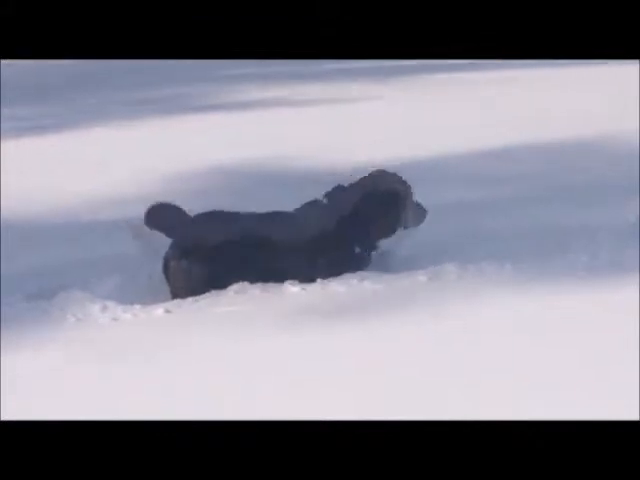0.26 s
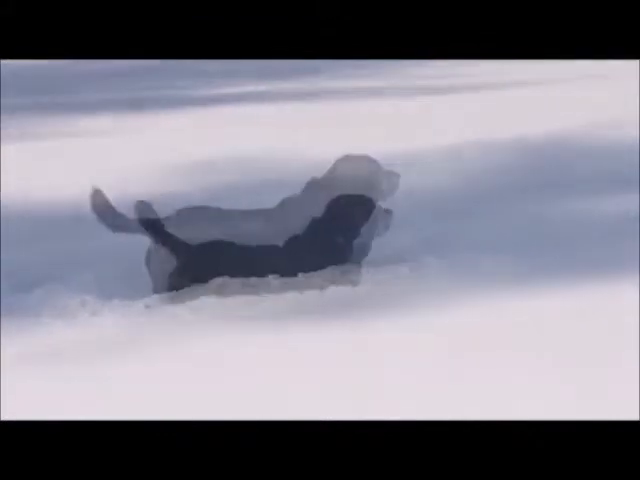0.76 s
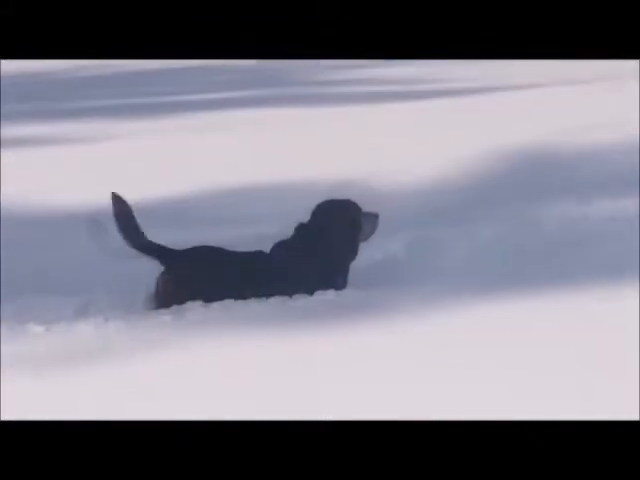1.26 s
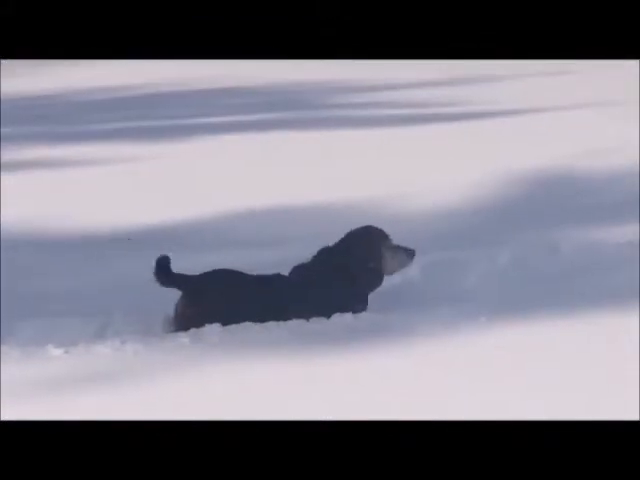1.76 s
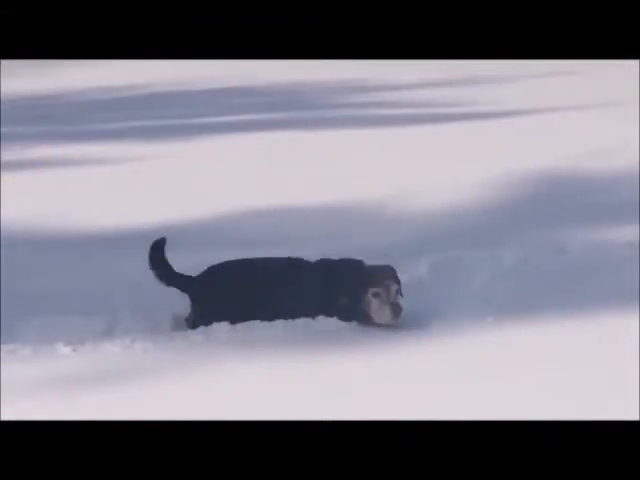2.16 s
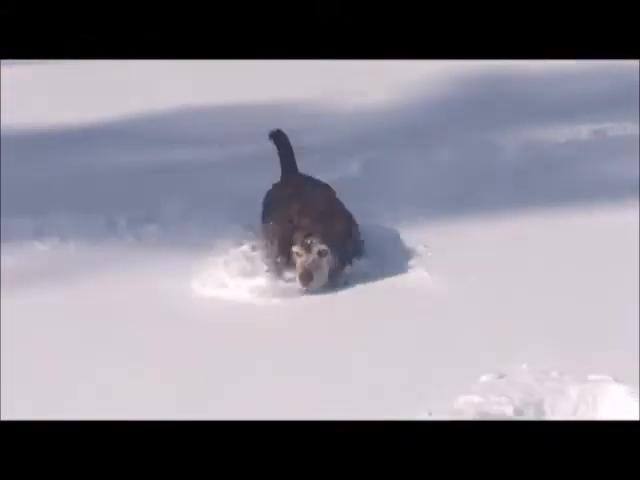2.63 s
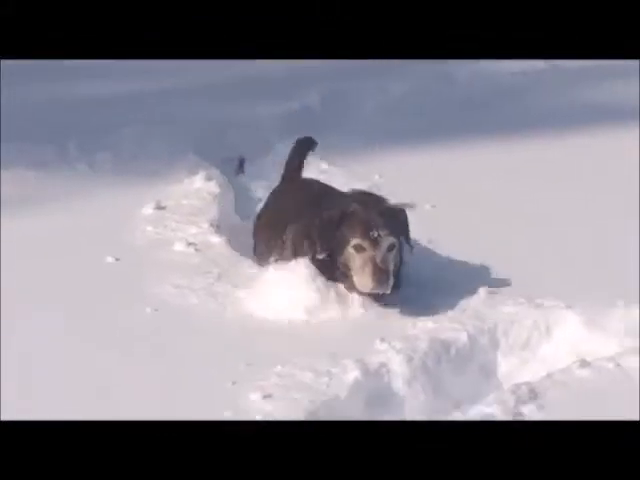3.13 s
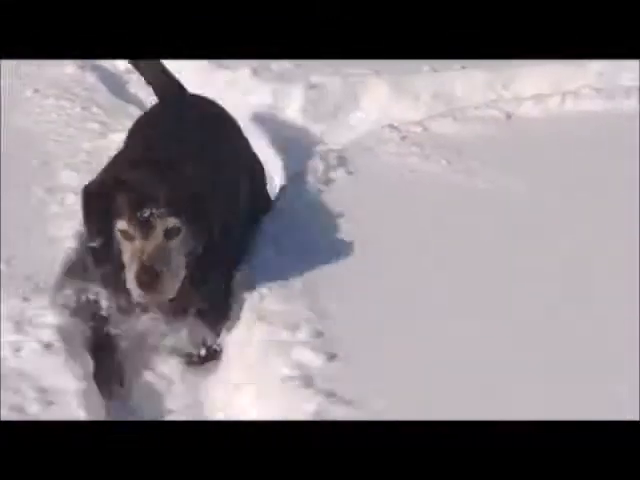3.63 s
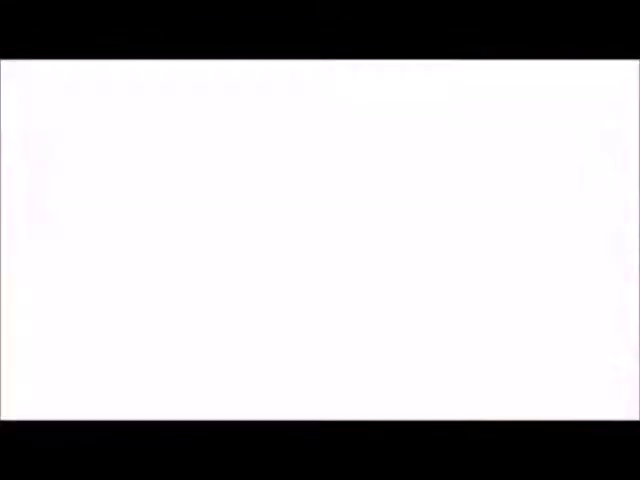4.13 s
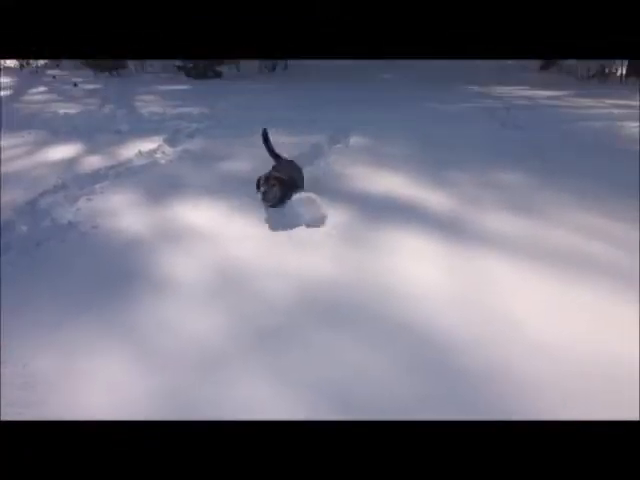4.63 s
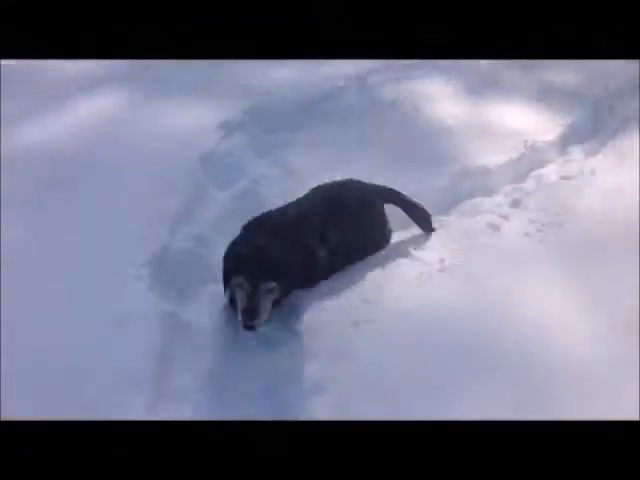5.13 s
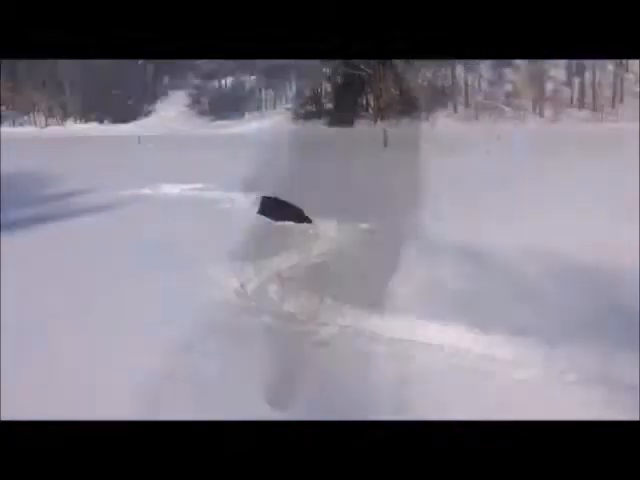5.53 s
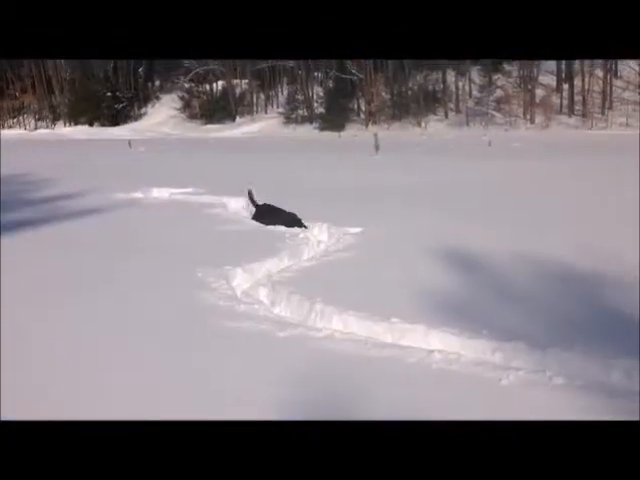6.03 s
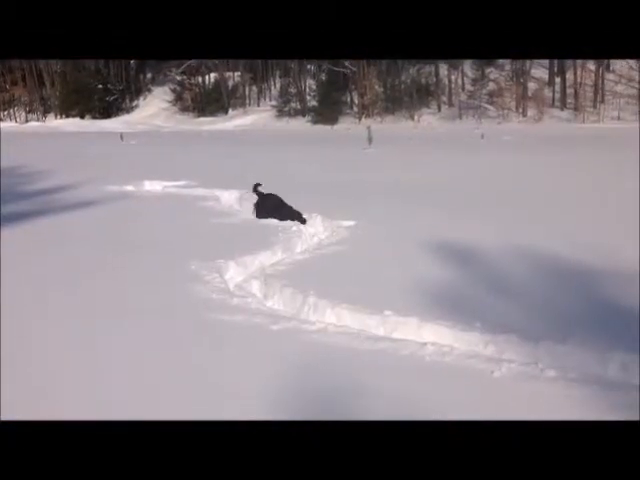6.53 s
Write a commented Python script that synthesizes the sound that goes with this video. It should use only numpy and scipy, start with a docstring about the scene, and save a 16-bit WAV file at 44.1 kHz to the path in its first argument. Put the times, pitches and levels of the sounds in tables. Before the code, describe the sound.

A dog wades through deep snow in a quiet open field, rustling and crunching faintly. Right at the microphone, fingers rub, tick and squeak on a small camera. Past the middle a loud sharp knock briefly cuts the sound out. The dog trots a few soft steps and two more knocks follow. The wading stops, leaving thin hiss and a barely audible distant engine.

```python
"""An open field in deep snow, heard through the microphone of a small hand-held camera.
From the start, over still winter air and hiss, a wading dog makes the snow rustle and crunch faintly,
while fingers rub, squeak and tick on the case, right at the microphone. After four seconds a hard knock
jolts the camera and the sound drops out briefly. The dog trots a few steps, and two more knocks follow.
As the wading stops, a far-off engine comes in for the last second."""
import sys
import numpy as np
from scipy import signal
from scipy.fft import rfft, irfft
from scipy.io import wavfile
from scipy.ndimage import uniform_filter1d

SR = 44100
rng = np.random.default_rng(int(sys.argv[2]) if len(sys.argv) > 2 else 0)


def int16_out(signal):
    """Quantize to a 16-bit WAV file."""
    q = np.round(np.clip(np.atleast_2d(signal).T, -1, 1) * 32767)
    wavfile.write(sys.argv[1], SR, q.astype(np.int16))


N = 299424
TIME = np.arange(N) / SR


# Hard knocks on the camera, right at the microphone. Each row: start in seconds, snap peak in dB,
# snap cutoff in Hz, thump gain in dB, thump pitch in Hz, thump decay in cycles, thump low cut in Hz,
# rattle gain in dB, release time in seconds, release click peak in dB.
KNOCKS = [(4.1039, -0.5, 3043, 1.5, 296, .5, 232.2, -38.5, 4.1454, -21),
          (5.0603, -5.5, 3400, -4, 255, 0.51, 55, -38.5, 5.1118, -23),
          (5.6363, -3, 3030, -4, 288, 0.51, 79.5, -40, 5.6845, -27)]
# The rattle after a knock. Each row: frequency in Hz, relative level in dB.
RATTLE_SPECTRUM = [(60, -5), (250, 5.5), (500, -8.5), (900, -12), (2000, -19), (2900, -17), (5000, -23),
                   (8000, -34.5), (15000, -45.5)]

def knocks(bounce_s=.00075, bounce_db=-19, rattle_s=0.0071, linger_db=-9):
    """A hard snap with a tiny bounce, a damped thump, then a rattle that ends in a release click."""
    out = np.zeros(N)
    t = clock(.03)
    tap = signal.unit_impulse(len(t))

    def swing(hz, cycles):
        """The camera body swings and dies within a cycle or two."""
        return np.sin(2 * np.pi * hz * t) * np.exp(-t * hz / cycles)

    for s, snap_db, snap_hz, thump_db, hz, cycles, cut_hz, rattle_db, release_s, click_db in KNOCKS:
        snap = peak(butter(tap, snap_hz, "low", order=3), snap_db)
        thump = undb(thump_db) * butter(swing(hz, cycles), cut_hz, "high", order=1)
        add(out, s, snap + thump)
        add(out, s + bounce_s, undb(bounce_db) * snap)
        held = clock(release_s - s)
        rattle = colour(grains(len(held), rate=3000, spread_db=1.2), RATTLE_SPECTRUM)
        settling = undb(linger_db) + 3.7 * np.exp(-held / rattle_s)
        add(out, s, level(rattle, rattle_db) * settling)
        click = peak(butter(tap, 3200, "low"), 0) + 0.42 * swing(hz=1100, cycles=0.32)
        add(out, release_s, peak(click, click_db))
    return out


# Finger strokes on the case, close to the microphone. Each row: start in seconds, rise in seconds,
# length in seconds, level at the crest in dB, damping of the case as a factor.
FINGER_STROKES = [(0.103, .008, 0.3, -57, 2), (.257, 0.019, 0.043, -39, 3.4),
                  (.29, 0.055, .088, -44.5, 3.1), (.645, 0.018, .17, -50.5, 1.3),
                  (1.382, 0.037, 0.058, -62.5, 0.91), (2.55, .014, .14, -50.5, 1.4),
                  (2.688, .016, 0.062, -47, 1.3), (2.731, 0.031, 0.18, -57, 1.7),
                  (3.453, .002, 0.027, -31, 16), (3.465, 0.016, 0.041, -33.5, 5.5),
                  (3.504, 0.016, 0.059, -39.5, 4.6), (3.568, 0.015, 0.034, -45, 4.5),
                  (3.594, 0.0056, 0.062, -33.5, 4.3)]

def rubs(rise_db=10, fall_db=15.5, edge_s=0.0021, fizz_db=-33):
    """Stick-slip of skin drives the case in swelling strokes; firm ones are brighter and fizz."""
    out = np.zeros(N)
    for s, rise_s, length, db, damping in FINGER_STROKES:
        t = clock(length)
        swell_db = np.interp(t, [0, rise_s, length], [-rise_db, 0, -fall_db])
        edges = np.minimum(np.minimum(t, t[-1] - t) / edge_s, 1)
        stroke = edges * undb(swell_db)
        slips = grains(len(t), rate=4500, spread_db=3) * stroke
        sound = level(case(slips, damping, soft_hz=5500 + 150 * damping, crisp_db=-47), 0)
        sound[:len(t)] += damping * level(butter(slips, 6100, "high"), fizz_db)
        stroke_rms = np.sqrt(np.sum(stroke ** 2) / len(sound))
        add(out, s, sound * undb(db) * stroke_rms)
    return out


# The clearest finger taps on the case. Each row: start in seconds, peak in dB, contact cutoff in Hz.
FINGER_TICKS = [(0.3855, -21, 4200), (0.619, -35.5, 9100), (1.4942, -44, 12000), (2.1475, -39, 6000),
                (3.4467, -21, 5970), (3.4538, -24, 12000), (3.4562, -23.5, 16000), (3.769, -32, 6000),
                (3.912, -43.5, 6000), (4.0084, -31, 5150)]

def ticks(fidget_s=(3.65, 4.0), faint_db=-46.5, faint_hz=7500, scatter_db=2, count=6):
    """Taps on the case, a nail brighter than a fingertip, plus faint random ones as the grip shifts."""
    out = np.zeros(N)
    faint = [(rng.uniform(*fidget_s), faint_db + scatter_db * rng.standard_normal(), faint_hz)
             for _ in range(count)]
    for s, db, contact_hz in FINGER_TICKS + faint:
        tick = case(np.ones(1), damping=1.9, soft_hz=contact_hz, skirt=1.0)
        add(out, s, peak(tick, db))
    return out


# Skin squeaking on the case. Each row: start in seconds, length in seconds, peak in dB.
SKIN_SQUEAKS = [(0.514, 0.02, -53.5), (0.743, 0.011, -48.5), (0.829, 0.015, -45), (.842, 0.0074, -48),
                (0.915, 0.026, -43), (0.937, 0.0115, -48.5), (1.05, 0.013, -39.5)]

def squeaks(start_hz=3500, end_hz=1450, bend=1.2, octave_db=-22):
    """Regular slips slow down as the finger stops, loudest as they sweep through the case modes."""
    out = np.zeros(N)
    for s, length, db in SKIN_SQUEAKS:
        progress = clock(length) / length
        slip_hz = start_hz + (end_hz - start_hz) * progress ** bend
        phase = 2 * np.pi * np.cumsum(slip_hz) / SR
        grip = np.abs(np.sin(np.pi * progress ** 1.12))  # builds more slowly than it lets go
        slips = (np.sin(phase) + undb(octave_db) * np.sin(2 * phase)) * grip
        add(out, s, peak(case(slips, damping=5), db))
    return out


# Modes of the case around the microphone. Each row: frequency in Hz, base width in Hz, gain in dB.
CASE_MODES = [(2976, 200, 9.5), (3390, 295, 2.5), (3770, 210, -5.5), (4425, 210, -2.5), (7250, 1600, -28)]

def case(force, damping, soft_hz=9000, skirt=0.29, crisp_db=-50):
    """The case rings; a pressing finger widens the modes and passes more force straight through."""
    force = np.pad(force, (0, 400))  # room to ring out
    damping = max(damping, 1)
    ring = 0
    for hz, width, db in CASE_MODES:
        once = resonate(force, hz, width * damping)
        twice = resonate(once, hz, width * damping)
        ring = ring + undb(db) * (twice + skirt * damping * once)
    return butter(ring, soft_hz, "low") + undb(crisp_db) * damping * force


# The dog's loudest steps, out in the field. Each row: start in seconds, peak in dB, pitch in Hz.
STEP_CRUNCHES = [(.631, -47, 259), (0.913, -48, 500), (1.432, -48.5, 280), (1.964, -51.5, 790),
                 (2.206, -45, 780), (2.859, -45.5, 398), (3.174, -44, 477), (3.186, -40.5, 318),
                 (3.454, -27, 330), (4.271, -43.5, 750), (4.417, -42, 620), (4.672, -43.5, 550),
                 (4.880, -43, 564), (4.921, -39, 720), (5.0233, -39.5, 850), (5.032, -35, 580),
                 (5.406, -41.5, 550), (5.537, -39.5, 640)]

def crunches(collapse_s=.005, small_over_rustle_db=11.5, small_hz=550, scatter_octaves=.4, count=26):
    """Packed snow collapses in dull cracks, muffled by powder; lesser collapses come at random."""
    out = np.zeros(N)
    times = (np.arange(count) + rng.random(count)) * WADING_END_S / count
    small = [(s, wading_db(s) + small_over_rustle_db + 2 * size, small_hz * 2 ** (scatter_octaves * z))
             for s, (size, z) in zip(times, rng.standard_normal((count, 2)))]
    for s, db, hz in STEP_CRUNCHES + small:
        cracks = undb(-10) * grains(len(clock(collapse_s)), rate=450, spread_db=4.5)
        cracks[0] = 1  # the opening crack
        body = resonate(np.pad(cracks, (0, 400)), hz, width_hz=0.92 * hz)
        muffled = butter(body, 2.2 * hz, "low")
        add(out, s, peak(muffled, db))
    return out


# The dog's deep plunges into powder. Each row: start in seconds, length in seconds, crest level in dB.
PLUNGES = [(4.232, 0.029, -54.5), (4.841, 0.027, -50.5), (5.584, 0.034, -53)]

def swishes(trot_start_s=4.364, paw_period_s=.116, paw_s=0.027, paw_db=-61, paws=4):
    """Loose powder slides in short soft swells, swept aside by a plunge or brushed by a trotting paw."""
    out = np.zeros(N)
    trot = [(trot_start_s + k * paw_period_s, paw_s, paw_db) for k in range(paws)]
    for s, length, db in PLUNGES + trot:
        n = len(clock(length))
        sliding = resonate(rng.standard_normal(n), hz=3480, width_hz=1100)
        powder = butter(sliding, 6500, "low", order=4)
        add(out, s, level(powder, db) * signal.windows.cosine(n))
    return out


# The snow's rustle as it reaches the microphone. Each row: frequency in Hz, relative level in dB.
RUSTLE_SPECTRUM = [(24, -55.5), (40, -28), (80, -21), (108, 0.5), (240, 0.5), (292, -2), (325, -3.5),
                   (370, -4.5), (547, -9.5), (1540, -18.5), (3510, -13.5), (5170, -21.5), (7000, -19),
                   (9100, -55.5), (15400, -120)]

def rustle(split_hz=1400, grain_flicker_db=2.7, powder_flicker_db=2.0):
    """Dull snow grains shift unevenly under a smooth hiss of powder as the dog wades."""
    shifts = level(grains(N, rate=1200, spread_db=3), 0)
    packed = butter(shifts, split_hz, "low") * undb(grain_flicker_db * wander(25))
    powder = butter(rng.standard_normal(N), split_hz, "high") * undb(powder_flicker_db * wander(29))
    snow = butter(colour(packed + powder, RUSTLE_SPECTRUM), 5500, "low")
    return level(snow, 0) * undb(wading_db(TIME)) * (TIME < WADING_END_S)


# The wading, faint at the microphone, in two stretches. Each row: time in seconds, level in dB.
WADING_LEVELS = [
    [(0.0, -62), (0.35, -58), (1.74, -66.5), (2.61, -63), (3.17, -64), (3.56, -58.5), (4.08, -61.5)],
    [(4.26, -63), (4.778, -62), (4.912, -56.5), (5.024, -56), (5.296, -58.5), (5.536, -54.5), (5.6, -55)],
]
WADING_END_S = 5.685

def wading_db(s):
    """Level of the wading at time s."""
    return np.interp(s, *np.vstack(WADING_LEVELS).T)


def engine(start_s=5.7, throttle_s=5.95, firing_hz=318, climb_hz_per_s=22, fade_s=0.23, db=-73):
    """A far engine holds its speed, then gathers more; mostly its second harmonic crosses the snow."""
    hz = firing_hz + climb_hz_per_s * np.maximum(TIME - throttle_s, 0)
    phase = 2 * np.pi * np.cumsum(hz * (1 + 0.0053 * wander(30))) / SR
    flutter = undb(3 * wander(16))
    tone = (np.sin(2 * phase) + undb(-9) * np.sin(phase)) * flutter
    fade = np.clip(np.minimum(TIME - start_s, TIME[-1] - TIME) / fade_s, 0, 1)
    return level(tone, db) * fade


# Winter air over the open field. Each row: frequency in Hz, relative level in dB.
AIR_SPECTRUM = [(25, -4.5), (60, -0.5), (100, 5.5), (180, 3), (330, -3.5), (700, -5), (1100, -11.5),
                (3000, -12.5), (7000, -19.5), (16000, -25)]

def air(db=-66.0, drift_db=0.46):
    """Still outdoor air makes a low hush whose level drifts slightly."""
    hush = colour(rng.standard_normal(N), AIR_SPECTRUM)
    return level(hush, db) * undb(drift_db * wander(1.9))


# The microphone's own noise. Each row: frequency in Hz, relative level in dB.
HISS_SPECTRUM = [(3000, -24), (7000, -9), (9200, -0.5), (12000, -9.5), (16000, -10.5)]
# The rise and fall of that noise. Each row: time in seconds, level in dB.
HISS_LEVELS = [(0, -70), (1.0, -67), (1.6, -71.5), (4.9, -70.5), (6.79, -73)]

def microphone_hiss():
    """The microphone adds a thin, high hiss under everything."""
    hiss = colour(rng.standard_normal(N), HISS_SPECTRUM)
    return level(hiss, np.interp(TIME, *np.transpose(HISS_LEVELS)))


def undb(db):
    """Decibels to gain."""
    return 10 ** (np.asarray(db) / 20)


def level(x, db):
    """Scale to an rms level."""
    return x * undb(db) / np.sqrt(np.mean(x ** 2))


def peak(x, db):
    """Scale to a peak level."""
    return x * undb(db) / np.max(np.abs(x))


def clock(length):
    """Sample times of a short sound."""
    return np.arange(max(int(length * SR), 16)) / SR


def add(out, s, x):
    """Mix x into out from time s."""
    start = max(int(round(s * SR)), 0)
    out[start:start + len(x)] += x[:max(N - start, 0)]


def butter(x, hz, kind, order=2):
    """Low-pass or high-pass."""
    return signal.sosfilt(signal.butter(order, min(hz, SR / 2 - 100), kind, fs=SR, output="sos"), x)


def resonate(x, hz, width_hz):
    """One resonance, gain 1 at its centre."""
    return signal.lfilter(*signal.iirpeak(hz, hz / min(width_hz, SR / 4), fs=SR), x)


def colour(x, points):
    """Shape x by a spectrum of (Hz, dB) points."""
    hz, db = np.transpose(points)
    bins = np.maximum(np.fft.rfftfreq(len(x), 1 / SR), 1)
    return irfft(rfft(x) * undb(np.interp(np.log(bins), np.log(hz), db)), len(x))


def wander(rate):
    """Smooth random drift with a spread near 1, taking a new value rate times a second."""
    k = int(SR / rate)
    return uniform_filter1d(np.repeat(rng.standard_normal(N // k + 1), k), k)[:N]


def grains(n, rate, spread_db):
    """Tiny slips at random moments, about rate a second, most weak and a few strong."""
    size = undb(spread_db * np.minimum(rng.exponential(size=n), 4))
    return (rng.random(n) < rate / SR) * rng.choice([-1, 1], n) * size


def scene():
    """Handling at the microphone, the dog in the snow, the background beyond: mono, with no echo."""
    handling = rubs() + ticks() + squeaks() + knocks()
    return (handling + crunches() + swishes() + rustle() + engine() + air() + microphone_hiss())[None]


def record(dry, low_cut_hz=178, bass_floor_db=-18, dropout_s=(4.149, 4.245), top_hz=15800):
    """A wind filter thins the bass, the sound drops out briefly, the top peak clips, treble is cut."""
    bins = np.fft.rfftfreq(N, 1 / SR)
    wind_filter = 1 - (1 - undb(bass_floor_db)) / (1 + (bins / low_cut_hz) ** 6)
    thinned = irfft(rfft(dry) * wind_filter, N)
    muted = (TIME > dropout_s[0]) & (TIME < dropout_s[1])
    mute_db = muted * np.maximum(-12.5 - 350 * (TIME - dropout_s[0]), -28)  # drops, then sinks further
    clipped = np.clip(thinned * undb(uniform_filter1d(mute_db, size=64)), -.96, .96)
    return signal.sosfilt(signal.ellip(10, .1, 90, top_hz, fs=SR, output="sos"), clipped)


dry = scene()
out = record(dry)
int16_out(out)
```